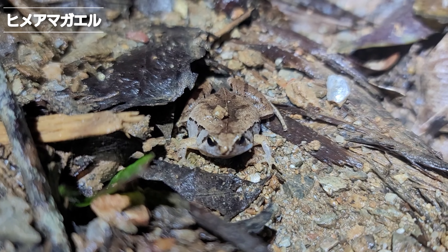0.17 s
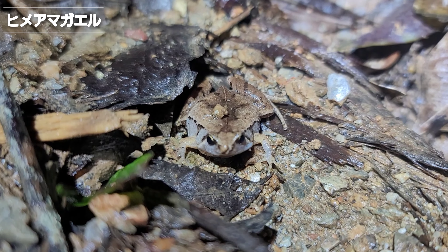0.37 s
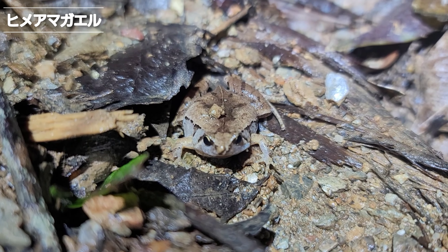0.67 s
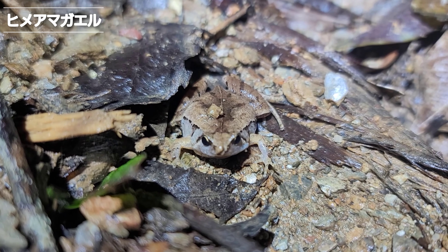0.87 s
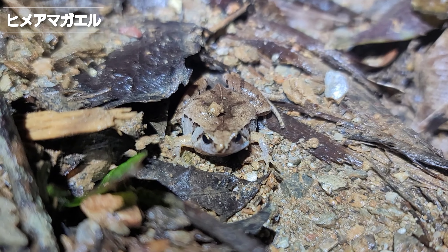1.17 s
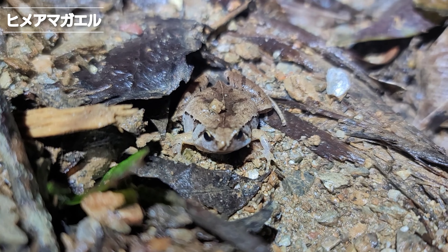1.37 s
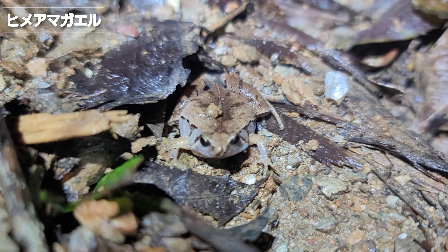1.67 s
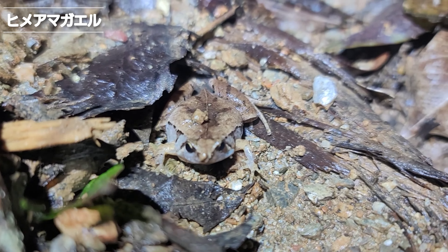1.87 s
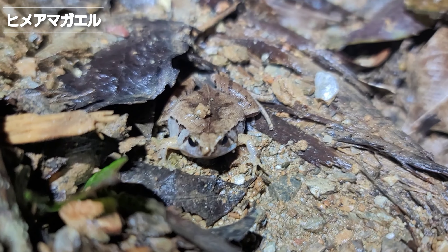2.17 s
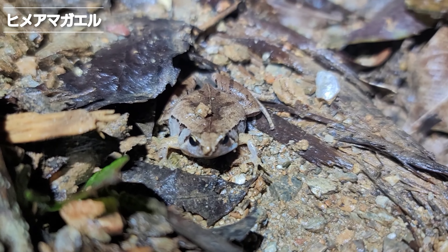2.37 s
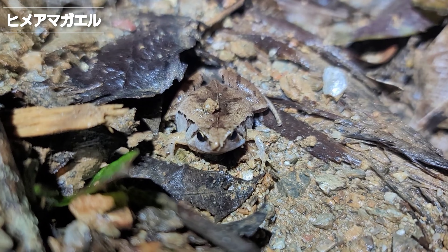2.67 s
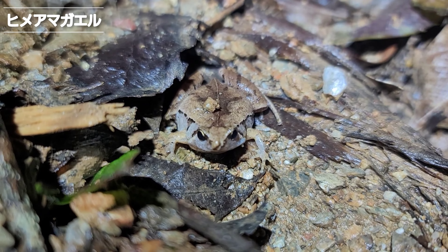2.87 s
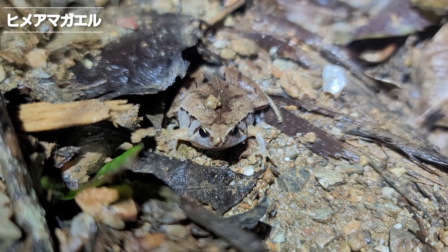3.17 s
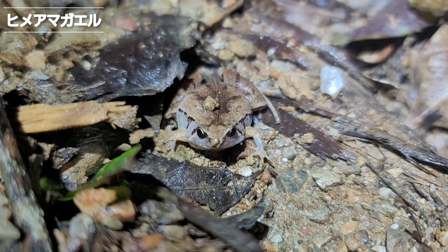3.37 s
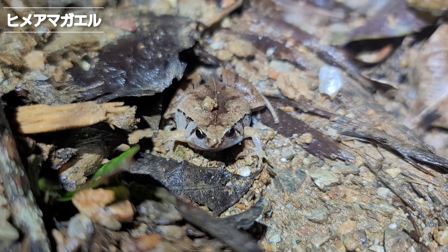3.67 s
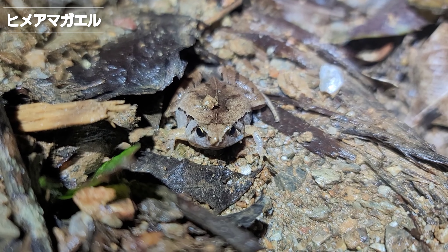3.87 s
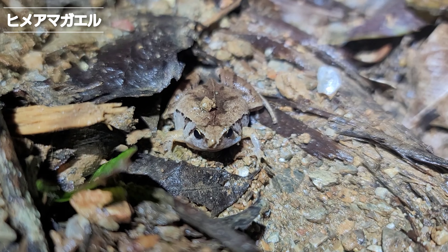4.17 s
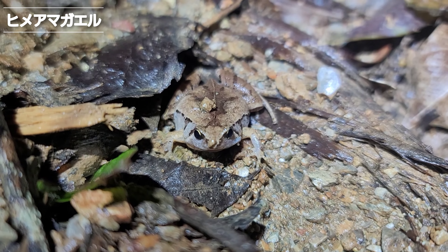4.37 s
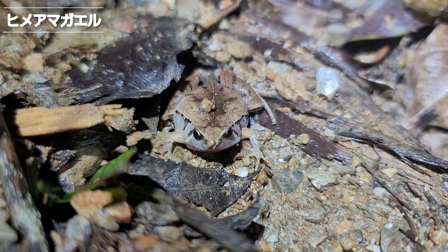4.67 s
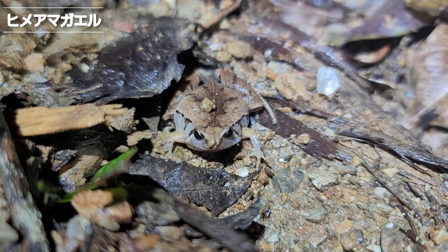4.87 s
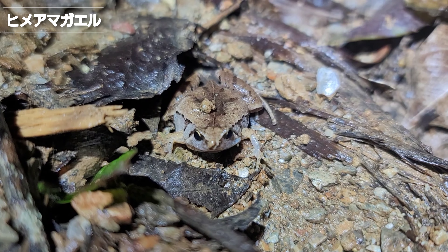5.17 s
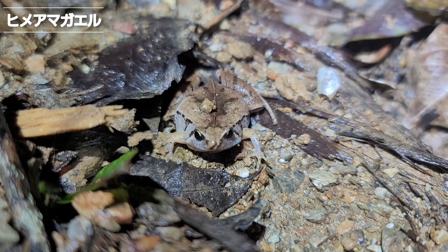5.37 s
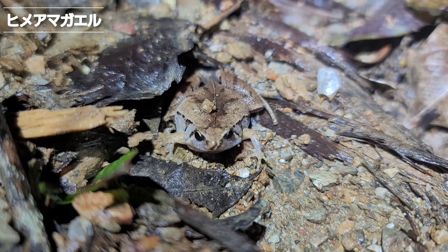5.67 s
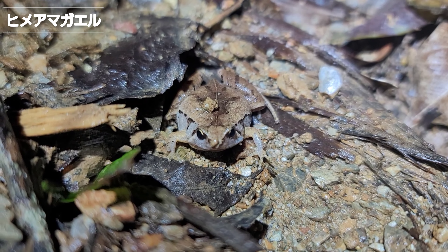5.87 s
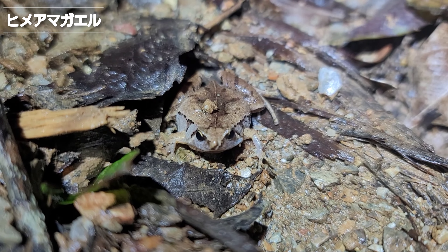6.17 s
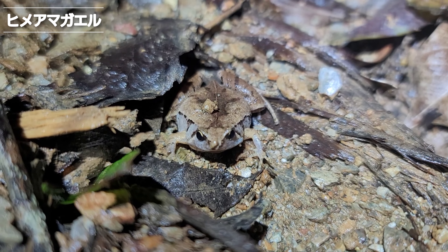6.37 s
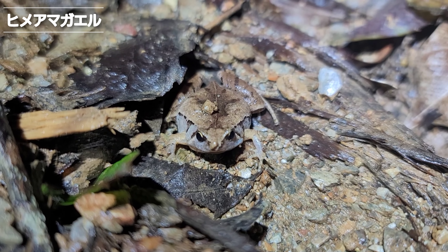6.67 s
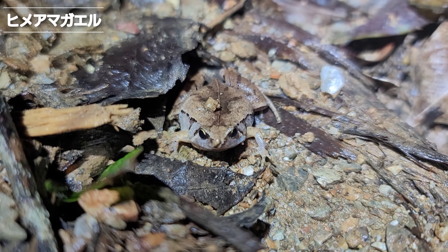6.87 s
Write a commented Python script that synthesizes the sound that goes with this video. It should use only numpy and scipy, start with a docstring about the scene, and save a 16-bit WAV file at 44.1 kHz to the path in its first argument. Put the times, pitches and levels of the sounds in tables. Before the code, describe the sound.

On a forest floor at night, small frogs very near the microphone give short rattles of six to eight dry, woody clicks, at first in overlapping pairs, later singly about once every second or less. Many distant frogs chirp continuously and swell in answer. Crickets hold a high fluttering drone, with a few trills standing out, and a katydid rasps faintly midway. Dead leaves tick and knock softly.

```python
"""Rattling frogs in a night forest

Small frogs on the forest floor give short rattles of dry clicks close by, at times two at once. Each click is a
brief ring of the frog's body, with echoes from leaves and trees. Far frogs, made of many fading tones, answer
in waves, and a few whistle. Crickets drone (noise) and trill (pulsed tones), a katydid rasps (rough noise), dry
leaves tick and soft low knocks sound now and then (short noise bursts). Beneath lie a faint low tone and the
hush of the night air."""
import sys
import numpy as np
from scipy import signal
from scipy.fft import rfft, irfft
from scipy.io import wavfile
from scipy.ndimage import uniform_filter1d

SR = 44100
rng = np.random.default_rng(int(sys.argv[2]) if len(sys.argv) > 2 else 0)


def wav_out(sig):
    """Save sig, one row per channel (or a flat mono array), as 16-bit PCM at SR to the path in sys.argv[1]."""
    wavfile.write(sys.argv[1], SR, np.round(np.clip(np.atleast_2d(sig).T, -1, 1) * 32767).astype(np.int16))


N = 309141
T = np.arange(N) / SR  # time in seconds


def undb(db):
    """Turn decibels into a gain."""
    return 10 ** (np.asarray(db) / 20)


def unit(x):
    """Scale a sound to an rms of 1."""
    return x / np.sqrt(np.mean(x ** 2))


def curve(rows):
    """Join the (time, value) rows of a table by straight lines."""
    times, values = np.transpose(rows)
    return np.interp(T, times, values)


def across(points, hz):
    """Read (pitch, value) points at any pitch, on a logarithmic pitch axis."""
    point_hz, value = np.transpose(points)
    return np.interp(np.log(hz + 1e-9), np.log(point_hz), value)


def pan(x, db):
    """Make left louder than right by db decibels (a negative db favours the right)."""
    return x * undb(np.array([[db], [-db]]) / 2)


def walk(rate):
    """Smooth random wandering: random levels held for 1 / rate seconds, then smoothed twice."""
    hold = int(SR / rate)
    steps = np.repeat(rng.standard_normal(N // hold + 1), hold)
    smooth = uniform_filter1d(uniform_filter1d(steps, hold), hold)
    return unit(smooth[:N])


def swell(start, length, crest):
    """A smooth arch from 0 to 1 and back that peaks after the share crest of its length."""
    progress = np.interp(T, start + length * np.array([0, crest, 1]), [0, .5, 1])
    return np.sin(np.pi * progress)


def noise():
    """Two unrelated channels of plain noise."""
    return rng.standard_normal((2, N))


# how alike left and right are in sound from all around: pitch_hz, correlation (-1 to 1)
LEFT_RIGHT_LIKENESS = [(60, 0.46), (130, -0.023), (290, -0.19), (640, -0.52), (1400, -0.69), (2600, -0.017),
                       (15000, -0.014)]


def diffuse(pair, colour):
    """Colour two unrelated signals and mix them as sound that comes from all around."""
    hz = np.fft.rfftfreq(pair.shape[1], 1 / SR)
    alike = across(LEFT_RIGHT_LIKENESS, hz)
    shares = np.sqrt([(1 + alike) / 2, (1 - alike) / 2])
    mid, side = rfft(pair) * undb(across(colour, hz)) * shares
    return irfft(np.array([mid + side, mid - side]), pair.shape[1])


def ring(db):
    """The ringing after one knock, with the given gains and no sound before the knock (minimum phase)."""
    cepstrum = irfft(db * np.log(10) / 20)
    half = len(cepstrum) // 2
    cepstrum[1:half] *= 2
    cepstrum[half + 1:] = 0
    return irfft(np.exp(rfft(cepstrum)))


def reflections(t60):
    """Countless weak echoes over half a second: noise that falls by 60 dB in t60 s, energy 1 per channel."""
    t = np.arange(SR // 2) / SR
    tail = rng.standard_normal((2, len(t))) * np.exp(-np.log(1000) * t / t60)
    return tail / np.sqrt(np.sum(tail ** 2) / 2)


def scatter(x, t60):
    """Smear a sound by many weak reflections, keeping about the same energy."""
    return signal.fftconvolve(x[None], reflections(t60), axes=1)[:, :N]


def add(out, s, sound):
    """Mix a sound in at time s."""
    i = max(int(s * SR), 0)
    part = sound[..., :max(N - i, 0)]
    out[..., i:i + part.shape[-1]] += part


# night air before stirring and panning: pitch_hz, level_db (per Hz)
AIR_COLOUR = [(25, -110), (64, -100), (100, -101), (160, -104), (270, -101), (350, -97.5), (450, -100),
              (800, -95.5), (3000, -99), (5500, -105.5), (7000, -107.5), (7800, -100.5), (8600, -106),
              (9400, -115), (15500, -118)]


def air(stir_db=1.4, rumble_early_db=3, rumble_late_db=-3):
    """Faint forest hush, made of noise, over a low rumble that slowly ebbs."""
    hush = diffuse(noise(), AIR_COLOUR) * np.sqrt(SR / 2)
    rumble = signal.sosfiltfilt(signal.butter(2, 170, fs=SR, output="sos"), hush)
    ebb = undb(np.linspace(rumble_early_db, rumble_late_db, N))
    return pan(hush - rumble, -1.55) * undb(stir_db * walk(15)) + pan(rumble, -4.5) * ebb


# a faint low tone, one row: start_s, length_s, pitch_hz, level_db (peak before the echoes smear it)
FAINT_LOW_TONE = (4.12, .24, 345, -70)


def low_tone(waver=0.029):
    """A low sine tone with a wavering pitch swells once, smeared by echoes as if far away."""
    start, length, pitch_hz, db = FAINT_LOW_TONE
    hz = pitch_hz * (1 + waver * walk(30))
    tone = np.sin(2 * np.pi * np.cumsum(hz) / SR)
    return scatter(tone * swell(start, length, .5) * undb(db), .2)


def tap(colour, t60, sharp):
    """One push and the rustle after it, coloured by what is struck; rms 1 over its first 10 ms."""
    force = np.sqrt(1 - sharp) * reflections(t60)
    force[:, 0] += np.sqrt(sharp)
    hz = np.fft.rfftfreq(2048, 1 / SR)
    sound = signal.fftconvolve(force, ring(across(colour, hz))[None], axes=1)
    return sound / np.std(sound[:, :SR // 100])


# soft low knocks: # start_s, level_db (relative), centre_hz, fade_s (to fall 60 dB), sharp_share (0 to 1)
SOFT_KNOCKS = [(0.155, -54.5, 606, 0.073, 0.04), (0.196, -56.5, 358, 0.1, 0.12),
               (2.499, -55, 750, 0.063, 0.2), (2.518, -55, 320, 0.27, 0.1),
               (2.67, -54.5, 651, 0.05, 0.16), (3.545, -61, 315, 0.093, 0), (3.86, -63, 244, 0.095, 0.3),
               (4.307, -56.5, 660, 0.07, 0), (4.783, -59, 453, 0.052, 0.1), (5.004, -53, 640, 0.11, 0.17),
               (6.088, -58, 786, 0.09, 0.1), (6.2898, -52.5, 640, 0.02, 0.65),
               (6.3435, -60, 405, 0.03, 0.9), (6.376, -65, 600, 0.03, 0.8), (6.462, -59, 378, 0.05, 0.45)]
# ticks in the dry leaves: start_s, level_db (relative), fade_s (to fall 60 dB)
LEAF_TICKS = [(1.034, -54, 0.04), (2.0518, -49, 0.012), (2.0575, -51, 0.015), (2.653, -54, 0.017),
              (2.6818, -51.5, 0.032), (3.8586, -51.5, 0.14), (6.489, -57, 0.045), (6.841, -52, 0.02)]


def knocks_and_ticks(knock_db=-5, tick_db=-9):
    """Dull soft knocks and crisp ticks of dry leaves: short pushes that fade as noise."""
    out = np.zeros((2, N))
    for s, db, hz, t60, sharp in SOFT_KNOCKS:
        colour = [(hz / 5, -28), (hz / 2, -6), (hz, 0), (hz * 2, -10), (hz * 8, -40)]
        add(out, s, tap(colour, t60, sharp) * undb(db + knock_db))
    crisp = [(1000, -36), (5000, 18), (9000, 13), (15000, -3)]
    for s, db, t60 in LEAF_TICKS:
        add(out, s, tap(crisp, t60, sharp=0.086) * undb(db + tick_db))
    return out


# level of the cricket drone before its flutter and pan: time_s, level_db
DRONE_LEVEL = [(0, -54), (.22, -50.5), (.45, -55.5), (.85, -55), (1.22, -59.5), (1.75, -53), (2.15, -52),
               (2.55, -57), (2.72, -52), (3.2, -53), (3.72, -56.5), (4.05, -53.5), (4.45, -52), (4.7, -56),
               (5.1, -53.5), (5.55, -55.5), (6.02, -52.5), (7, -55)]
# colour of the drone: pitch_hz, level_db (relative)
CRICKET_BAND = [(3000, -39), (3600, -11), (3900, 2.5), (4250, 6.5), (4420, 4.5), (4600, -4), (5100, -13.5),
                (6000, -28.5)]


def drone(flutter_db=1):
    """Countless far crickets merge into one fluttering band of noise."""
    band = unit(diffuse(noise(), CRICKET_BAND))
    return pan(band * undb(curve(DRONE_LEVEL) + flutter_db * walk(50)), -2)


def teeth(colour):
    """Uneven tooth strikes of a wing file, heard as noise of quickly changing strength."""
    rough = noise() * undb(2.5 * walk(640))
    return unit(diffuse(rough, colour))


# katydid rasps: start_s, length_s, level_db (at the crest, before the flicker),
# crest_share (where it is loudest), arch_power (steepness of the arch)
KATYDID_RASPS = [(3.148, 0.58, -62, 0.37, 0.71), (4.03, 0.72, -66.5, 0.45, 0.56)]
# colour of the rasps: pitch_hz, level_db (relative)
RASP_COLOUR = [(7000, -24), (9300, -7), (10300, -2), (11500, 0), (12800, -1.5), (14000, -4.5), (15500, -4),
               (16500, -30)]
# colour of the katydids further off: pitch_hz, level_db (relative)
FAR_HISS_COLOUR = [(7000, -25), (9800, -10), (11500, 0), (13000, -2), (15500, -28)]


def katydid(far_db=-75.5, flicker_db=1.1):
    """A file rasps high up in bouts of uneven tooth strikes; others further off merge into a duller hiss."""
    bouts = np.zeros(N)
    for start, length, db, crest, arch in KATYDID_RASPS:
        bouts += undb(db) * swell(start, length, crest) ** arch
    hiss = teeth(RASP_COLOUR) * bouts + teeth(FAR_HISS_COLOUR) * undb(far_db)
    return hiss * undb(flicker_db * walk(16))


def cricket(trills, strokes_per_s, stroke, sag, lag_s, pan_db, third_db, echo_db):
    """Each wing stroke sounds a short tone that sags; a trill grows louder, settles on its pitch and stops."""
    settle_share, waver, echo_t60 = 0.55, 0.00314, 0.12
    out = np.zeros((2, N))
    for start, end, first_hz, last_hz, db, swell_db in trills:
        settled = np.clip((T - start) / (end - start) / settle_share, 0, 1)
        # place within each wing beat, -0.5 to 0.5, with slightly uneven timing
        cycle = ((T - end) * strokes_per_s + .2 + 0.027 * walk(6.6)) % 1 - .5
        wing = np.cos(np.pi * np.clip(cycle / stroke, -.5, .5)) * undb(2.3 * walk(70))
        hz = (first_hz + (last_hz - first_hz) * settled) * (1 - sag * cycle + waver * walk(120))
        # the tone reaches the left microphone a little later
        phase = 2 * np.pi * (np.cumsum(hz) / SR - hz * np.array([[lag_s], [0]]))
        tone = unit(wing * (np.sin(phase) + undb(third_db) * np.sin(3 * phase)))
        edges = np.clip(np.minimum(T - start, end - T) / 0.028, 0, 1)
        tone *= edges * undb(db + swell_db * (settled - 1))
        echo = undb(echo_db) * scatter(tone[1], echo_t60)
        out += pan(tone + echo, pan_db) / np.sqrt(2)
    return out


# trills of the lower cricket: start_s, end_s, first_hz, last_hz, level_db (relative), swell_db
LOWER_CRICKET_TRILLS = [(-.1, 0.75, 4420, 4590, -54.7, 11), (2.651, 3.64, 4386, 4594, -55, 8),
                        (5.7, 6.49, 4380, 4585, -54.3, 13)]
# trills of the higher cricket: start_s, end_s, first_hz, last_hz, level_db (relative), swell_db
HIGHER_CRICKET_TRILLS = [(0.86, 1.385, 4760, 4920, -63.7, 6), (2.953, 3.5286, 4750, 4850, -62.5, 2),
                         (5.416, 5.895, 4840, 4880, -63, 3)]


def crickets():
    """Two crickets stand out: a lower, purer one on the right and a higher, pulsing one among the trees."""
    lower = cricket(LOWER_CRICKET_TRILLS, strokes_per_s=47.8, stroke=0.85, sag=0.014,
                    lag_s=.00007, pan_db=-5, third_db=-33, echo_db=-3)
    higher = cricket(HIGHER_CRICKET_TRILLS, strokes_per_s=51.2, stroke=0.46, sag=0.16,
                     lag_s=.00005, pan_db=1.5, third_db=-17, echo_db=1)
    return lower + higher


def far_frogs(colour, low_hz, high_hz, t60, sag_hz_per_s, blur_db, count):
    """Many rattles of seven fading notes, 20 to 23 a second, each frog on its own pitch, blurred by noise."""
    t = np.arange(SR // 16) / SR
    fade = (1 - np.exp(-t * 1000)) * np.exp(-np.log(1000) * t / t60)
    rattles = np.zeros((2, N))
    for k, (start, pitch, rate, loud) in enumerate(rng.random((count, 4))):
        frog_hz = low_hz + pitch * (high_hz - low_hz)
        for n, (turn, waver) in enumerate(rng.random((7, 2))):
            hz = frog_hz * (1 + .03 * waver)
            s = ((k + start) / count * T[-1] + n / (20 + 3 * rate)) % T[-1]
            note = np.sin(2 * np.pi * ((hz - sag_hz_per_s * t / 2) * t + turn))
            add(rattles[k % 2], s, undb(10 * loud - n) * fade * note)
    blur = unit(diffuse(noise(), colour))
    voices = unit(diffuse(rattles, colour)) + undb(blur_db) * blur
    # even out the loudness over an eighth of a second
    return voices / np.sqrt(uniform_filter1d(np.mean(voices ** 2, axis=0), SR // 8))


# colour of the farthest frogs: pitch_hz, level_db (relative)
FARTHEST_COLOUR = [(1200, -75), (2250, -22), (2480, -2), (2660, -3), (2800, -6), (3020, -25), (4500, -75)]


def ringing(level_db=-55.5, flutter_db=1.5):
    """The farthest frogs never pause; the strongest part of their voices is a flutter of falling chirps."""
    chirps = far_frogs(FARTHEST_COLOUR, low_hz=2600, high_hz=2880, t60=0.17,
                       sag_hz_per_s=3400, blur_db=-10, count=56)
    return undb(level_db) * chirps * undb(flutter_db * walk(25))


# waves of far frogs' answers: start_s, length_s, high_level_db, low_level_db
# (level of the high and low voices at the crest, before the bed, stir and pan)
ANSWER_WAVES = [(0.082, 0.42, -45.5, -47.5), (0.673, 0.5, -45, -47.5), (1.082, 0.9, -52.5, -52.5),
                (1.974, 0.5, -45, -48), (2.528, 0.54, -45.5, -50.5), (3.124, 0.92, -49.5, -47),
                (4, 0.9, -52, -48.5), (5.03, 0.43, -45, -49.5), (5.914, 0.53, -47.5, -48.5),
                (6.7, 0.33, -47.5, -50.5)]
# share of a wave after which each group is loudest
HIGH_CREST, LOW_CREST = 0.55, 0.23
# colour of the high voices: pitch_hz, level_db (relative)
HIGH_COLOUR = [(1500, -54), (2100, -12.5), (2400, -3.5), (2650, -2.5), (2820, -5.5), (3050, -6.5),
               (3500, -16), (4500, -34), (7000, -52)]
# colour of the low voices: pitch_hz, level_db (relative)
LOW_COLOUR = [(500, -47), (900, -28), (1080, -7), (1250, 6.5), (1600, 1), (2050, 2), (2500, 1.5),
              (3500, -40)]


def chorus(high_stir_db=0.76, low_stir_db=1.08):
    """Two groups of far frogs call all the time, thinning slowly, and swell in waves of answers."""
    high = far_frogs(HIGH_COLOUR, low_hz=2398, high_hz=2915, t60=0.15,
                     sag_hz_per_s=3320, blur_db=2.5, count=180)
    low = far_frogs(LOW_COLOUR, low_hz=1034.5, high_hz=2219, t60=0.091,
                    sag_hz_per_s=0, blur_db=8, count=180)
    # the bed between the waves, from first to last level in dB
    high_power = undb(np.linspace(-49.5, -50.5, N)) ** 2
    low_power = undb(np.linspace(-49.5, -52, N)) ** 2
    for start, length, high_db, low_db in ANSWER_WAVES:
        high_power += (undb(high_db) * swell(start, length, HIGH_CREST)) ** 2
        low_power += (undb(low_db) * swell(start, length, LOW_CREST)) ** 2
    high_group = pan(high, -2.5) * np.sqrt(high_power) * undb(high_stir_db * walk(16))
    low_group = pan(low, -1) * np.sqrt(low_power) * undb(low_stir_db * walk(10))
    return high_group + low_group


# colour of the treble hiss: pitch_hz, level_db (relative)
TREBLE_COLOUR = [(3500, -15), (5500, -2.5), (8000, -3.5), (10000, -13), (12500, -6), (15500, -22)]


def treble_hiss(below_low_voices_db=-19):
    """A thin hiss of noise high up comes and goes with the waves of calls, in step with the low voices."""
    waves = np.zeros(N)
    for start, length, _, low_db in ANSWER_WAVES:
        waves += undb(low_db) * swell(start, length, LOW_CREST)
    return unit(diffuse(noise(), TREBLE_COLOUR)) * waves * undb(below_low_voices_db)


# single whistles of far frogs: start_s, length_s, first_hz, last_hz, level_db (peak before the echoes)
WHISTLES = [(0.608, 0.039, 2570, 2610, -54), (1.028, .07, 2680, 2630, -50), (1.295, 0.064, 2820, 2730, -48),
            (1.354, 0.053, 2690, 2550, -49), (3.788, .08, 2810, 2480, -52.5),
            (3.961, .045, 2830, 2710, -57)]


def peeps(echo_t60=.15):
    """Now and then one far voice gives a short whistle, a sine that slides in pitch, smeared by the trees."""
    tones = np.zeros(N)
    for start, length, first_hz, last_hz, db in WHISTLES:
        hz = np.interp(T, [start, start + length], [first_hz, last_hz])
        whistle = np.sin(2 * np.pi * np.cumsum(hz) / SR)
        tones += undb(db) * swell(start, length, 0.27) * whistle
    return tones + undb(-9) * scatter(tones, echo_t60)


# rattles of the near frogs: first_click_s, last_click_s, click_count, first_late_s (first click late by),
# end_hurry_s, level_db (relative), first_softer_db, fade_db (by the last click), body_hz,
# brightness_db, woody_ring_db
NEAR_RATTLES = [(0.0737, 0.3096, 6, 0.0025, .002, -32, 1, 10.5, 1240, 1.5, -2),
                (0.08, 0.3551, 7, .002, 0.0017, -32.5, 3, 9.5, 1310, 0.5, 3),
                (0.705, 0.938, 6, 0, 0.0021, -31, 2.5, 11, 1297, -0.5, 2),
                (0.7407, 1.024, 7, 0.0042, .002, -31.5, 2.5, 11, 1233, -1.5, 1),
                (1.308, 1.578, 7, .0015, 0.0092, -32, 5, 14.5, 1270, 0, 1),
                (1.9757, 2.204, 6, 0.0018, .0002, -31, 4.5, 17, 1390, 2, -3),
                (2.0018, 2.334, 8, 0.00073, 0.0072, -30.5, 7, 14, 1250, 0.5, 3),
                (2.6437, 2.9765, 8, 0.001, 0.0021, -31, 6, 13.5, 1243, -1.5, 1),
                (3.3813, 3.669, 7, 0.00056, 0.00403, -32.5, 2.5, 10, 1290, 4, -1),
                (4.091, 4.3838, 7, 0, 0.0044, -33.5, 3, 9.5, 1257, 3.5, -4),
                (5.0018, 5.336, 8, 0.00019, 0.0093, -33.5, 2, 11, 1247, 0, -5),
                (5.915, 6.207, 7, 0.0016, 0.0011, -33, 2, 10.5, 1258, 0.5, 2),
                (6.766, 6.906, 4, 0, 0.0016, -27.5, 3.5, 5.5, 1340, -2, 11.5)]
FADE_CURVE, HURRY_CURVE = 1.14, 6  # powers of progress: a late fade, and only the last gaps shorten
BRIGHTEN_DB = 2  # each click is brighter than the one before
# random spread from click to click (pitch as a share)
UNEVEN_DB, UNEVEN_BRIGHT_DB, UNEVEN_PITCH, UNEVEN_RING_DB = .5, 0.4, 0.024, 1


def clicks():
    """A rattle is a run of clicks: the first soft and late, then they fade, brighten and hurry at the end."""
    for (first, last, count, late_s, hurry_s, db, soft_db, fade_db,
         body_hz, bright_db, ring_db) in NEAR_RATTLES:
        beats = np.linspace(first - late_s, last + hurry_s, count)
        for n, (loud, bright, pitch, tight) in enumerate(rng.standard_normal((count, 4))):
            progress = n / (count - 1)
            is_first = n == 0
            yield (beats[n] + late_s * is_first - hurry_s * progress ** HURRY_CURVE,
                   db - soft_db * is_first - fade_db * progress ** FADE_CURVE + UNEVEN_DB * loud,
                   body_hz * (1 + UNEVEN_PITCH * pitch),
                   bright_db + BRIGHTEN_DB * n + UNEVEN_BRIGHT_DB * bright,
                   ring_db + UNEVEN_RING_DB * tight)


# colour of one click, before it is shifted to each frog's body: pitch_hz, level_db (relative)
CLICK_COLOUR = [(400, -43), (850, -24), (1020, -16.5), (1170, 4.5), (1280, 7), (1420, -1), (1600, -3.5),
                (1720, -18), (1850, -9), (2200, -16), (2650, -17.5), (2980, -32), (3600, -30.5),
                (7000, -65)]
COLOUR_BODY_HZ = 1270  # body pitch for which that colour holds
RING_HZ, RING_WIDTH_HZ = 2630, 210  # a woody upper resonance of the body
PORT_LAG_S, LITTER_LAG_S = .00043, .0045  # delay of the left microphone, and of the echoes


def frog(sweep_s=0.00096, linger_s=0.00047, litter_t60=0.071, forest_t60=0.16):
    """Each snap of the larynx rings the body in a quick upward chirp; litter and trees throw it back."""
    size, lead_s = 2048, .003
    gain_db, litter_db, forest_db = 3.4, -16.5, -17
    hz = np.fft.rfftfreq(size, 1 / SR)
    upper = across([(1400, 0), (1900, 1), (3000, 1), (4000, 0)], hz)
    woody = 1 / (1 + ((hz - RING_HZ) / RING_WIDTH_HZ) ** 2)
    # the low ring lags a little and the high part of a click comes last
    low_late = linger_s * across([(1100, 1), (1450, 0)], hz)
    high_late = sweep_s * across([(1600, 0), (2900, 1)], hz)
    late = lead_s + low_late + high_late
    chirp = np.exp(-2j * np.pi * (np.cumsum(late) - late[0]) * SR / size)
    out = np.zeros((2, N))
    for s, db, body_hz, bright_db, ring_db in clicks():
        body = across(CLICK_COLOUR, hz * COLOUR_BODY_HZ / body_hz)
        snap = ring(body + bright_db * upper + ring_db * woody)
        click = irfft(rfft(snap) * chirp)
        # set the energy: the level is an average over 4 ms
        click *= undb(db + gain_db) * np.sqrt(SR / 250 / np.sum(click ** 2))
        # leaves close by and trees further off scatter every click a little differently
        echoes = undb(litter_db) * reflections(litter_t60) + undb(forest_db) * reflections(forest_t60)
        add(out, s - lead_s + LITTER_LAG_S, signal.fftconvolve(click[None], echoes, axes=1))
        # the sound reaches the right microphone first
        add(out[0], s - lead_s + PORT_LAG_S, click)
        add(out[1], s - lead_s, click)
    return out


def scene():
    """The near frogs in front of the night forest."""
    background = air() + low_tone() + knocks_and_ticks()
    insects = drone() + katydid() + crickets()
    distant_frogs = ringing() + chorus() + treble_hiss() + peeps()
    return background + insects + distant_frogs + frog()


def record(dry):
    """The recorder cuts the top, above 15550 Hz, with a steep filter."""
    return signal.sosfilt(signal.ellip(10, .2, 70, 15550, fs=SR, output="sos"), dry)


dry = scene()
out = record(dry)
wav_out(out)
```